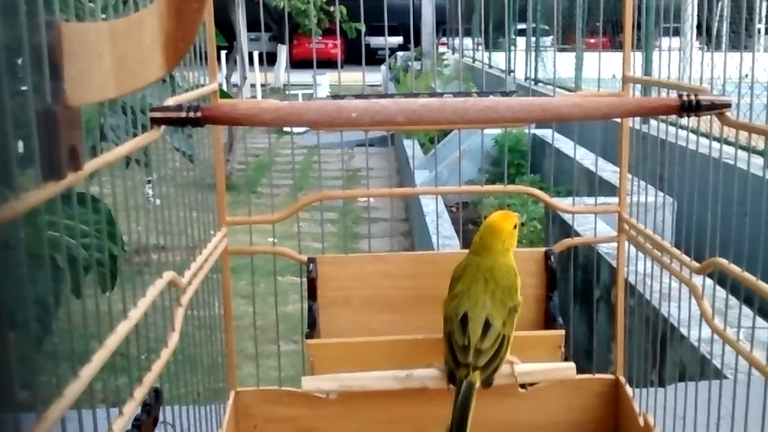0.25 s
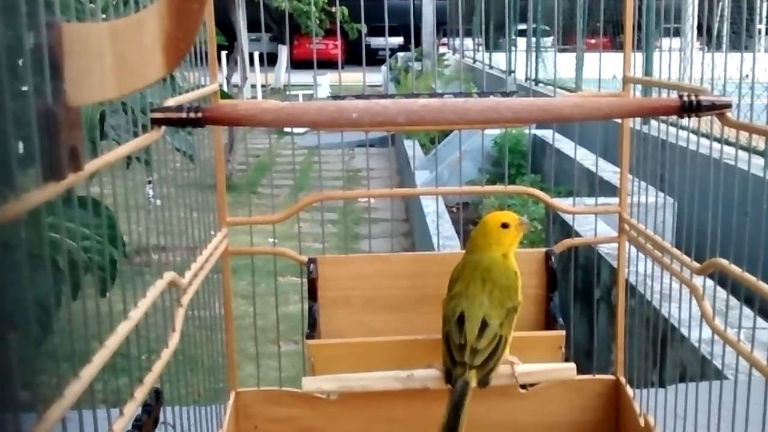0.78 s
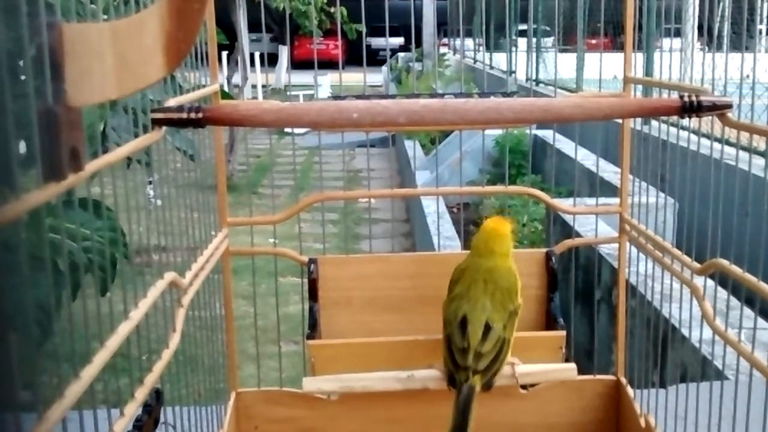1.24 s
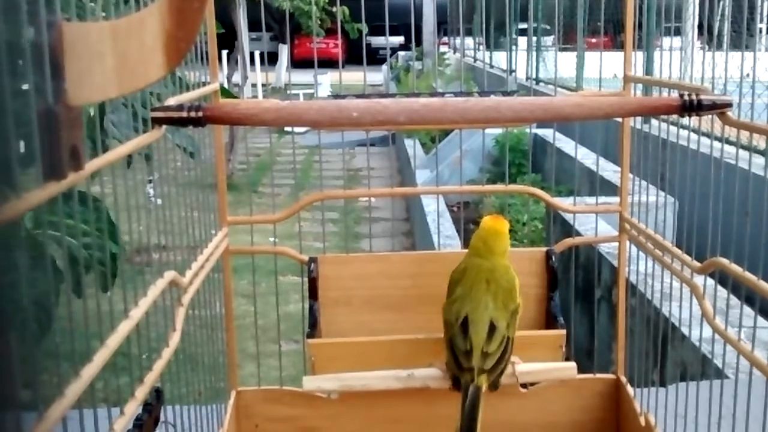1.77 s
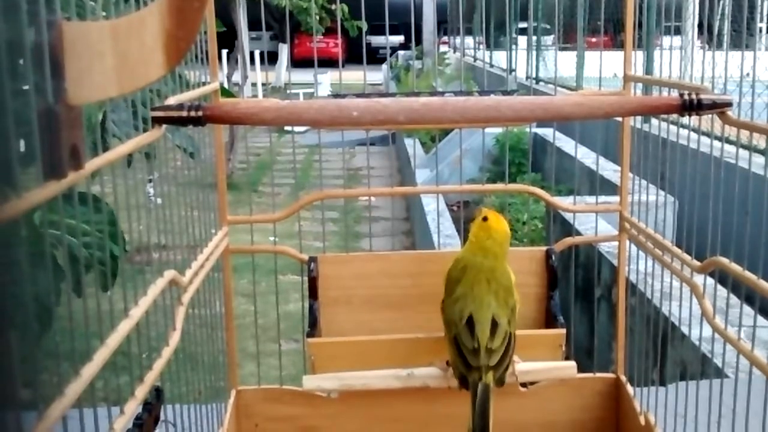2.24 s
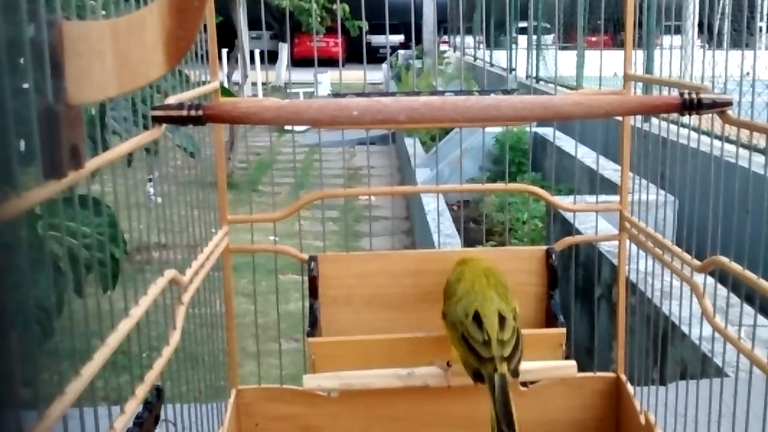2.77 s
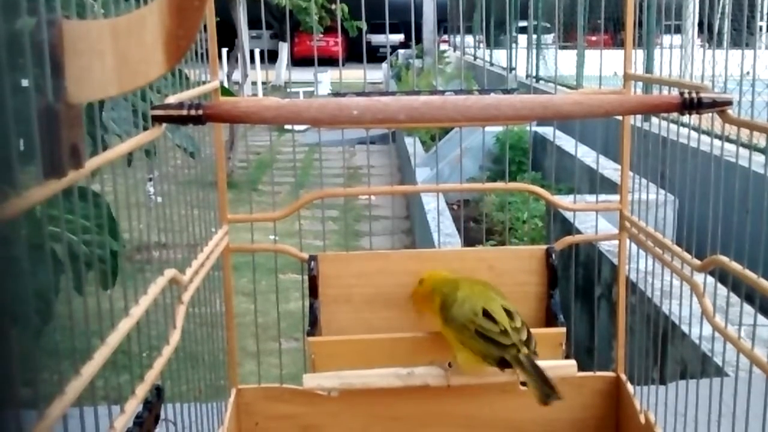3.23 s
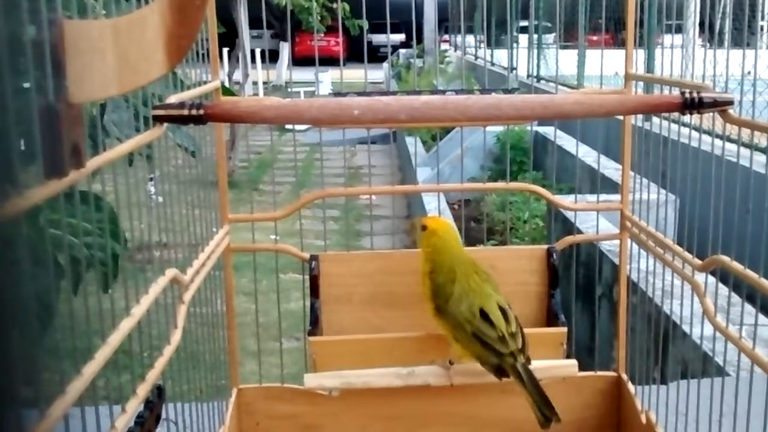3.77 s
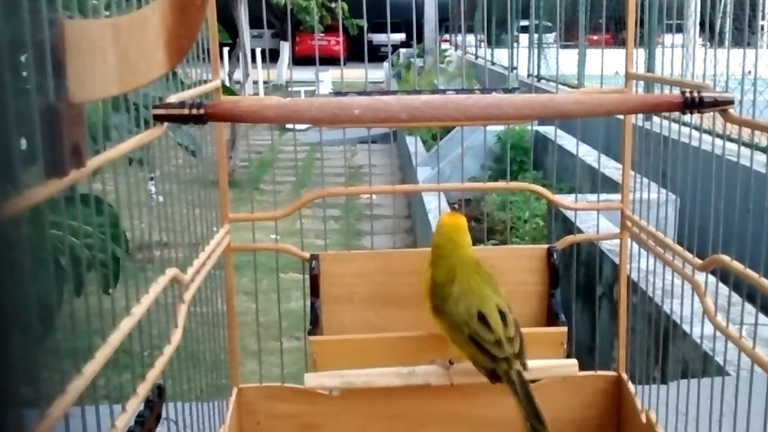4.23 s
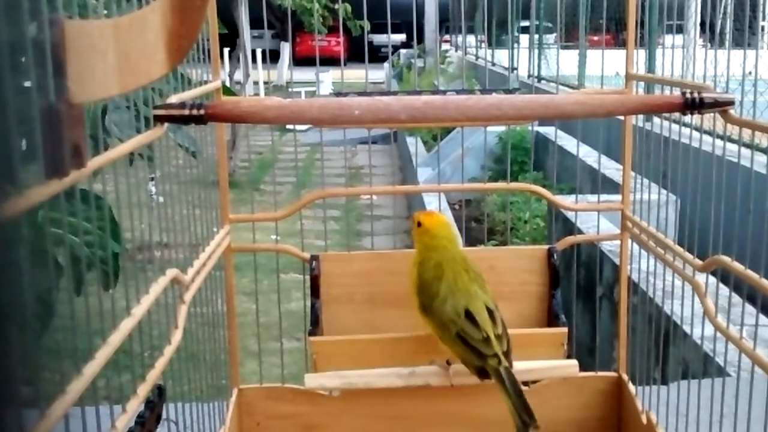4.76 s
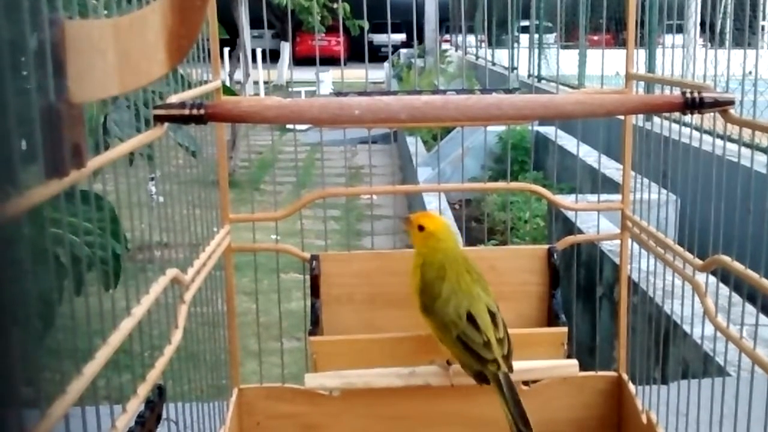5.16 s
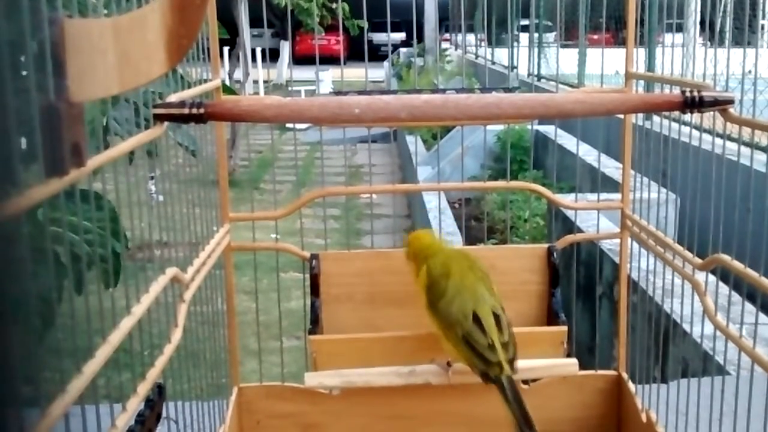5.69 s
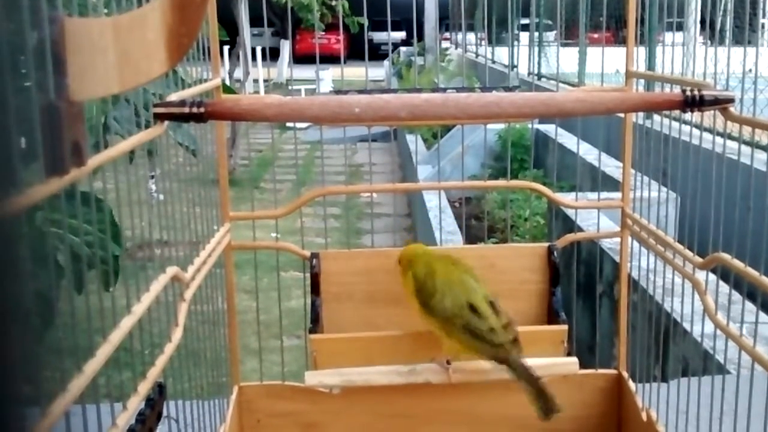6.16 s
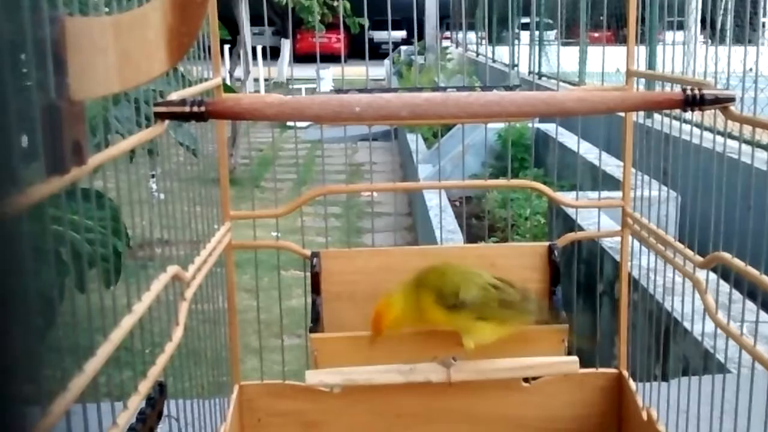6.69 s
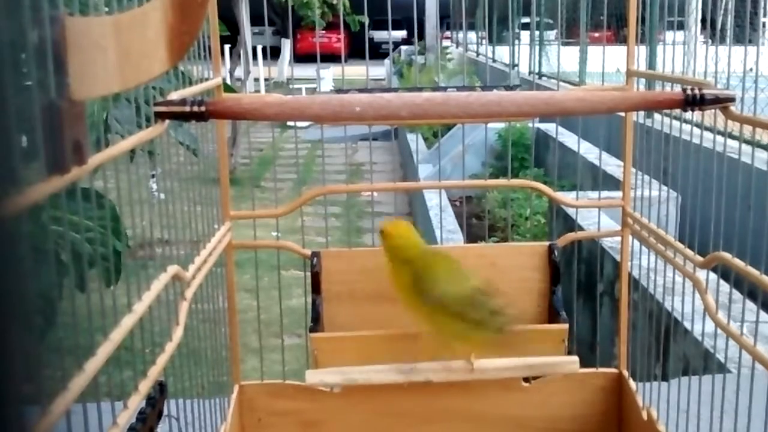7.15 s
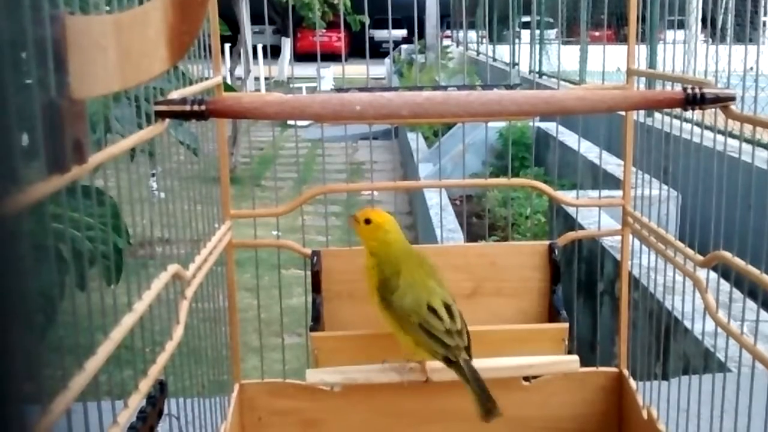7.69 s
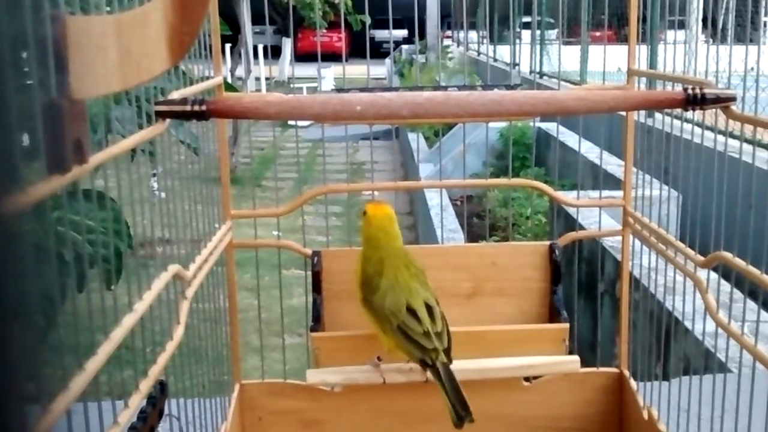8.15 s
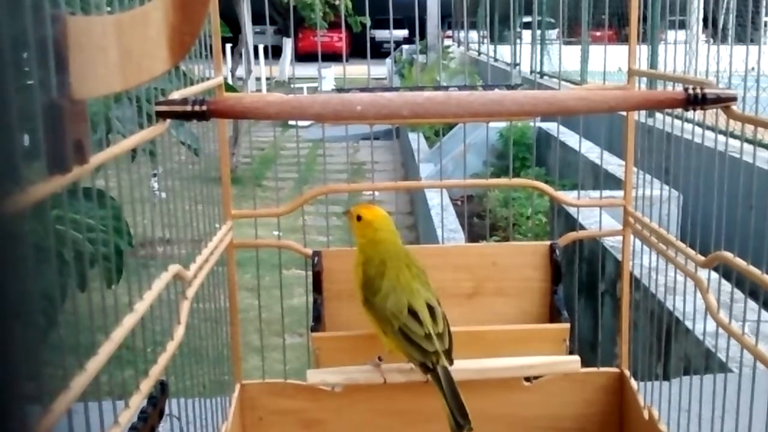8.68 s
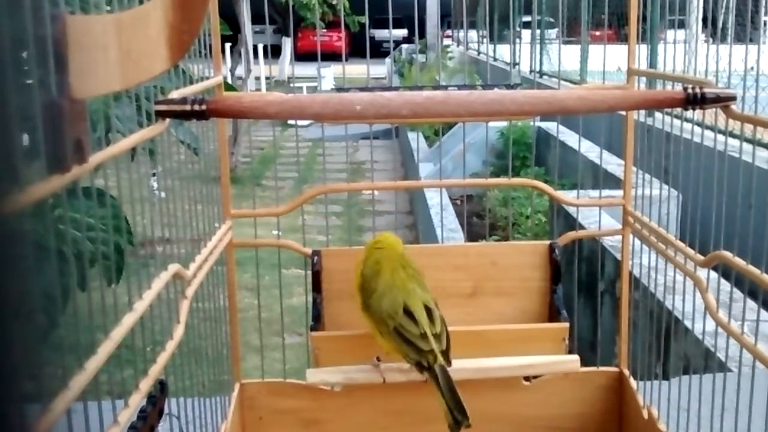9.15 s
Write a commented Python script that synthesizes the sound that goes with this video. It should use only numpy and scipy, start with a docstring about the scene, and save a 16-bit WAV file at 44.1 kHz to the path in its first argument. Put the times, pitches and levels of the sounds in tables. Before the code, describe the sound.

A small finch very close to a pocket stereo microphone sings brief, piercing whistles that swoop downward, singly or in tight pairs, with gaps between. Claws tick lightly on the wooden perch. Far birds trill and whistle softly. A low traffic hum, thin air hiss and gentle wind buffeting lie beneath. The walled yard gives slight, quick echoes.

```python
"""A caged finch whistles sharp falling notes close to a pocket camera with two microphone ports, in a walled yard.
Each note is a gliding near sine with an echo off the cage; three faint wall echoes and a dense ringing yard answer.
Claws tick on the perch as noise bursts; other birds trill and warble far off as softer glides.
Shaped noise makes the far traffic rumble, the air hiss and the wind buffeting the ports.
The camera's gain control ducks everything just after a loud note."""
import sys
import numpy as np
from scipy import signal
from scipy.fft import rfft, irfft
from scipy.io import wavfile
from scipy.ndimage import uniform_filter1d, minimum_filter1d

SR = 44100
rng = np.random.default_rng(int(sys.argv[2]) if len(sys.argv) > 2 else 0)


def generate_wav(sig):
    """Save sig (samples, or channels by samples) to the path in sys.argv[1] as 16-bit PCM at SR."""
    pcm = np.round(np.clip(np.atleast_2d(sig).T, -1, 1) * 32767).astype(np.int16)
    wavfile.write(sys.argv[1], SR, pcm)


N = 415422

# Traffic rumble and hiss at the left port: (frequency [Hz], level [dB per Hz])
RUMBLE = [(20, -70), (49, -64), (58, -51.5), (72, -68), (95, -67.5), (250, -58.5), (420, -67.5), (900, -77),
          (1900, -84), (2500, -91), (3500, -86), (5500, -87.5), (7000, -90.5), (10000, -92.5), (16000, -95)]
# Slow rise and fall of the traffic: (time [s], level [dB])
TRAFFIC_SWELL = [(0, 0), (3, 1.5), (7, 2.5), (7.8, 5), (9.42, 2)]
# Wind gusts on the ports: (middle [s], half width [s], level [dB])
GUSTS = [(0, 0.13, -45.5), (1.25, 0.31, -39.5), (4.42, 0.085, -32), (5.7, .5, -45)]
BREEZE_DB = -52.5  # steady light wind under the gusts
# Far whistles: (time [s], length [s], first pitch [Hz], last pitch [Hz], level [dB])
FAR_WHISTLES = [(0.986, 0.32, 5500, 5615, -62.5), (1.622, 0.17, 3817, 3728, -53),
                (5.649, .45, 5340, 5450, -58.5), (3.797, .02, 3450, 3550, -49),
                (3.844, 0.033, 3720, 3286, -44.5), (3.872, 0.089, 3680, 3650, -52.5),
                (3.895, 0.024, 3296, 3200, -47.5), (6.55, .4, 4030, 4050, -59),
                (8.72, 0.093, 1375, 1420, -47), (8.789, 0.1, 1446, 1580, -47)]
# Far even chatter of falling chips:
# (time [s], gap [s], length [s], first pitch [Hz], last pitch [Hz], level [dB])
CHATTER = (3.985, .079, .028, 3850, 3250, -42)
CHATTER_CHIPS, TRILL_CHIPS = 4, 13
# Far trills of rising chips that speed up: (time [s], first gap [s], shrink of the gap [s], level [dB])
TRILLS = [(2.226, .083, .0014, -39), (7.988, .0785, .00094, -36)]
# Claws on the perch: (time [s], level [dB], lower band against that level [dB])
TICKS = [(3.76, -42, 9), (4.1627, -31, -1), (4.4009, -32, -2.5), (5.7178, -25, -2), (6.016, -31.5, 2),
         (6.8081, -37.5, 9), (7.1313, -30, 4)]
TICK_T60_S = 0.036
# Right port against left: (frequency [Hz], level [dB], lag [rad], likeness of diffuse sound [0-1])
PORTS = [(0, -9.5, 2.0, 0.11), (248, -11, 3.4, 0.86), (830, -2.5, 6, 0.31), (2404, 0, 8.94, 1),
         (3430, -1, 12.36, .92), (4488, -1.65, 15, 0.98), (5580, -7, 18.6, 0.41), (6280, -16.5, 20.2, 0.28),
         (7137, -22.5, 21.4, 0.087), (8896, -16.5, 24.5, 0.17), (15800, -9, 45, .2)]
# Ringing of the yard: (frequency [Hz], time to fall 60 dB [s])
YARD = [(3000, 1), (5000, 0.61), (7000, 0.71), (10000, 0.18), (15000, 0.13)]
# Distinct wall echoes: (delay [s], level [dB])
WALLS = [(.055, -45), (.095, -43), (.205, -45)]
# Echoes off the cage floor and tray: (extra path [m], level [dB])
CAGE = [(1.9, -19), (2.9, -25)]
# The finch's overtones: (multiple of the pitch [-], level [dB])
OVERTONES = [(2, -28.5), (3, -43)]
# The finch's five kinds of note, each with columns (time [s], length [s], top [Hz], bottom [Hz], level [dB],
# swell over the note [dB], extra path of the cage echo [m], level of that echo [dB], bend of the fall [-])
# Falling notes, straight to curved, most of them leading into a held note
FALLS = [(0.024, 0.052, 7850, 6300, -7.5, -16, 0.5, -9, 1.8),
         (0.648, 0.046, 8150, 5424, -0.5, 7, 0.52, -0.5, 1.6),
         (1.961, 0.052, 4508, 3300, 5.5, -10.5, 1.6, -9.5, 1),
         (4.692, 0.043, 7970, 6000, -6, -9.5, 0.44, -1.5, 1.3),
         (5.316, 0.041, 8090, 5850, 1, -8.5, 0.52, -7.5, 1.42),
         (6.254, 0.042, 8630, 6046, 0, -10.5, 0.443, -5.5, 2.1),
         (7.794, 0.042, 7900, 5850, -2.5, 4.5, 1.42, -8.5, 1.4),
         (8.887, 0.045, 7650, 5600, -1.5, 9, 1.13, -14, 1.05)]
# Quick drops onto a held low note
HOLDS = [(0.0745, 0.033, 5800, 4433, 9, -0.5, 0.964, -19.5, 2.7),
         (0.698, 0.035, 5410, 4320, 8, -6, 1.7, -13.5, 2.2),
         (4.742, 0.029, 5483, 4433, 5, -10, 2.17, -8.5, 2.6),
         (5.36, 0.037, 5800, 4498, 5, -4, 0.311, -8, 2.2), (6.304, 0.03, 5370, 4515, 4.6, 1, 0.53, -7, 2.6),
         (7.841, 0.036, 5624, 4367, 4.6, -4, 0.339, -6.5, 2.2),
         (8.934, 0.035, 5360, 4479, 2, 3, 1.019, -9.5, 2)]
# Short soft grace notes before a sweep
GRACES = [(1.36, 0.022, 7500, 6760, -6.5, -20.5, 0.64, -2, 1.8),
          (1.813, 0.024, 7390, 7080, 0.5, -14, 0.638, 0, 1.8),
          (2.435, 0.018, 7600, 6505, -17, 3, 1.5, -5.5, 1.3),
          (2.899, 0.02, 7580, 6810, -10.5, -14, 1.2, -1.5, 1.8)]
# Long sweeps that level off and flick up
SWEEPS = [(1.384, 0.065, 7400, 4462, 6, 3, 0.241, -8.5, 1.5),
          (1.835, 0.061, 7500, 5255, 6.5, 7, 0.31, -4, 1.3),
          (2.458, 0.065, 7280, 4210, 6, 8.5, 0.95, -2, 1.4),
          (2.925, 0.068, 7410, 4170, 4, -4, 0.32, -10.5, 1.6)]
# Single falling slides, sung alone, that end nearly level in pitch
SLIDES = [(4.252, 0.048, 6720, 4737, -1.5, -7.5, 0.55, -9, 1.9),
          (7.259, 0.047, 6590, 4914, -3, 6.5, 0.87, -9, 1.6)]
# How each kind is sung: (notes, share of the length at the top [0-1], share where the bottom is reached [0-1],
# final upturn [Hz], attack [s], release [s])
SONG = [(SLIDES, 0.0082, .9, 60, .005, 0.0068), (FALLS, .13, .97, 30, 0.0034, .009),
        (HOLDS, .05, .27, 180, .006, 0.009), (GRACES, .01, .8, 100, 0.003, 0.0073),
        (SWEEPS, 0.0047, .87, 300, .008, 0.0051)]
# The last note is hoarse: (from time [s], pitch flutter [Hz], level flutter [dB])
HOARSE = (8.93, 80, 1.5)
# The last note splits into two strands: (from time [s], spacing [Hz], depth [0-1])
SPLIT = (8.93, 560, .6)
EDGE_DB = -26  # added to the level at both ends of a note
THIN_HZ, THIN_DB_PER_KHZ = 7660, -22.5  # the finch's voice thins out above this pitch
SOUND_M_PER_S = 343
BAND_LIMIT_HZ = 15750


def gain_of(db):
    """Decibels to gain."""
    return 10 ** (np.asarray(db) / 20)


def read(points, hz):
    """A table read on a log-frequency axis."""
    f, value = np.transpose(points)
    return np.interp(np.log(hz + 1), np.log(f + 1), value)


def ramp(x, start, end):
    """Straight line from zero at start to one at end, held flat outside."""
    return np.clip((x - start) / (end - start), 0, 1)


def add(mix, time_s, sound):
    """Mixes a sound in at a time."""
    part = mix[round(time_s * SR):][:len(sound)]
    part += sound[:len(part)]


def ports(left, other=None, shadow=0.89):
    """The right port hears the left one's sound late and shadowed; diffuse sound is only partly shared."""
    hz = np.fft.rfftfreq(len(left), 1 / SR)
    f, *columns = np.transpose(PORTS)
    db, lag, same = (np.interp(hz, f, column) for column in columns)
    right = rfft(left)
    if other is not None:
        same = np.clip(same, 0, 1)
        right = same * right + np.sqrt(1 - same ** 2) * rfft(other)
    db = np.where(hz > 4000, shadow * db, db)  # diffuse treble reaches round the camera body
    return np.array([left, irfft(right * gain_of(db) * np.exp(-1j * lag), len(left))])


def whistle(length, hz, db, steps, edge, flutter_hz, flutter_db, overtones=(), hiss_db=-99):
    """A near sine along pitch and level points, with unsteady pitch and level and a faint hiss along the tone."""
    at = np.linspace(0, 1, round(length * SR))
    pitch, level = (uniform_filter1d(np.interp(at, steps, c), 40, mode="nearest") for c in (hz, db))
    hiss, *shake = rng.standard_normal((3, SR // 2))
    # smoothed noise, scaled back to an rms near 1
    waver, flicker = (8 * uniform_filter1d(uniform_filter1d(c, 50), 50)[:len(at)] for c in shake)
    phase = 2 * np.pi * np.cumsum(pitch + flutter_hz * waver) / SR
    tone = np.sin(phase)
    for multiple, overtone_db in overtones:
        tone = tone + gain_of(overtone_db + 3.5 * flicker) * np.sin(multiple * phase)
    tone += gain_of(hiss_db) * np.diff(hiss)[:len(at)]
    fade = signal.windows.tukey(len(at), min(edge / length, 1))
    return gain_of(level + flutter_db * flicker) * tone * fade


def background(patchy_db=1.5):
    """Traffic rumble and air hiss: random short-time spectra in drifting patches."""
    frames, hz = N // 1024 + 5, np.fft.rfftfreq(4096, 1 / SR)  # long frames resolve the low hum
    a, b, c, d, patches = rng.standard_normal((frames, len(hz), 5)).T
    patches = uniform_filter1d(uniform_filter1d(patches, 40, 0), 4, 1)
    swell_db = np.interp(np.arange(frames) * 1024 / SR, *np.transpose(TRAFFIC_SWELL))
    low = np.clip(1.5 - hz / 4000, 0, 1)[:, None]  # traffic swells, the hiss stays
    size = gain_of(read(RUMBLE, hz)[:, None] + low * swell_db + patchy_db * patches / patches.std())
    spectra = np.array([a + 1j * b, c + 1j * d]) * size * 2.893  # scale for dB per Hz
    noise = signal.istft(spectra, nperseg=4096, noverlap=3072)[1]
    return ports(*noise[:, :N], shadow=0.051)


def wind():
    """Lumpy low buffeting that pushes the two ports in opposite ways."""
    low_band = signal.butter(2, [15, 60], "band", fs=SR, output="sos")
    shared, own = signal.sosfilt(low_band, rng.standard_normal((2, N)))
    t = np.arange(N) / SR
    gust = gain_of(BREEZE_DB)
    for middle, half_width, db in GUSTS:
        gust = gust + gain_of(db) * np.exp(-((t - middle) / half_width) ** 2)
    return gust / shared.std() * np.array([shared, 0.72 * own - 1.4 * shared])


def far_birds():
    """Far whistles and chatter, blurred by the air, and trills whose chips swell and grow steeper."""
    out = np.zeros(N)
    start, gap, *chip = CHATTER
    chatter = [(start + k * gap, *chip) for k in range(CHATTER_CHIPS)]
    for time_s, length, hz0, hz1, db in FAR_WHISTLES + chatter:
        blur_hz = .006 * hz0 + .2 * abs(hz1 - hz0)
        add(out, time_s, whistle(length, (hz0, hz1), (db, db), (0, 1), .02, blur_hz, 3.0))
    for start, gap, shrink, db in TRILLS:
        for k in range(TRILL_CHIPS):
            swell_db = db - 2.6 * abs(2 * k / TRILL_CHIPS - 1)  # strongest in mid trill
            length, hz = .027 - .0012 * k, (6750, 8300 + 60 * k)
            chip = whistle(length, hz, (swell_db, swell_db - 6.5), (0, 1), 0.008, 200, 4.1)
            add(out, start + gap * k - shrink * k * k / 2, chip)
    return out


def ticks():
    """Claws on wood and wire: short bursts of noise, bright with a lower knock."""
    out, t = np.zeros(N), np.arange(1200) / SR
    high = signal.butter(2, 4000, "high", fs=SR)
    low = signal.butter(2, [1500, 6000], "band", fs=SR)
    for (time_s, db, low_db), noise in zip(TICKS, rng.standard_normal((len(TICKS), 1200))):
        burst = noise * gain_of(db - 60 * t / TICK_T60_S)
        knock = gain_of(low_db) * signal.lfilter(*low, burst)
        add(out, time_s, signal.lfilter(*high, burst) + knock)
    return out


def yard(x, gap=0.017, lumpy_db=3.0):
    """Dense reflections from walls and paving that build up late in clumps, each band dying at its own speed."""
    hz, t, z = signal.stft(rng.standard_normal((2, SR)), SR, nperseg=256)
    lumps = uniform_filter1d(rng.standard_normal(z.shape[1:]), size=30, axis=0)
    lumps = uniform_filter1d(lumps, size=3, axis=1)
    decay_db = -60 * t / read(YARD, hz)[:, None]
    tail = signal.istft(z * gain_of(lumpy_db * lumps / lumps.std() + decay_db), SR, nperseg=256)[1]
    tail = tail * np.clip(np.arange(tail.shape[1]) / SR / gap - .3, 0, 1)  # late build-up
    wet = signal.fftconvolve(x[None], tail / np.linalg.norm(tail[0]), axes=1)[:, :N]
    return ports(*wet, shadow=.5)


def finch():
    """The bare notes, and the close echo of each that shifts as the head turns and notches the glide."""
    bare, echo = np.zeros((2, N))
    at = np.linspace(0, 1, 101)  # place within a note
    for notes, top_share, low_share, upturn_hz, attack, release in SONG:
        for time_s, length, top_hz, low_hz, db, swell_db, path, echo_db, bend in notes:
            hz = low_hz + (top_hz - low_hz) * (1 - ramp(at, top_share, low_share)) ** bend
            hz = hz + upturn_hz * ramp(at, min(low_share, .98), 0.92) ** 2
            ends = (1 - ramp(at * length, 0, attack)) ** 2 + ramp(at * length, length - release, length) ** 2
            thin_db = THIN_DB_PER_KHZ * np.maximum(hz - THIN_HZ, 0) / 1000
            level_db = db + swell_db * (at - .5) + EDGE_DB * ends + thin_db
            flutter = HOARSE[1:] if time_s > HOARSE[0] else (25, .4)  # Hz, dB
            note = whistle(length, hz, level_db, at, 0.0017, *flutter, OVERTONES, -48)
            if time_s > SPLIT[0]:
                _, spacing_hz, depth = SPLIT
                strands = 2 * np.cos(np.pi * spacing_hz * np.arange(len(note)) / SR)
                note = note * (1 - depth + depth * strands)
            add(bare, time_s, note)
            add(echo, time_s + path / SOUND_M_PER_S, gain_of(echo_db) * note)
    for path, db in CAGE:
        add(echo, path / SOUND_M_PER_S, gain_of(db) * bare)
    return bare, echo


def scene():
    """Near bird with a little yard and three faint wall echoes, far birds with much yard."""
    (bare, echo), far, claws = finch(), far_birds(), ticks()
    bright = signal.lfilter(*signal.butter(2, 5200, "high", fs=SR), bare)  # high notes beam toward the walls
    near = bare + echo
    for delay, db in WALLS:
        add(near, delay, gain_of(db) * bright)
    wet = yard(gain_of(-27) * bright + gain_of(-7) * far + gain_of(-12) * claws)
    return ports(near) + ports(far + claws, shadow=0.61) + wet + background() + wind()


def record(dry, knee_db=-26, share=.5, back_db=20, lag_s=.04, ceiling=.95):
    """Gain falls just after a loud note and creeps back; a quick limiter holds the peaks; then the band limit."""
    power_db = 10 * np.log10(abs(uniform_filter1d(dry[0] ** 2, 1500)) + 1e-12)
    power_db[0] = -18.5  # the gain starts slightly lowered
    fall = np.arange(N) * back_db / SR  # the held level sinks back_db each second
    over_db = np.maximum(np.maximum.accumulate(power_db + fall) - fall - knee_db, 0)
    late = np.r_[np.full(round(lag_s * SR), over_db[0]), over_db][:N]
    ducked = dry * gain_of(-share * uniform_filter1d(late, 1500, mode="nearest"))
    room = minimum_filter1d(np.minimum(ceiling / (abs(ducked).max(0) + 1e-9), 1), size=61)
    held = ducked * uniform_filter1d(room, size=61)
    band_limit = signal.firwin(255, BAND_LIMIT_HZ, window=("kaiser", 9), fs=SR)
    return signal.oaconvolve(held, band_limit[None], "same")


dry = scene()
out = record(dry)
generate_wav(out)
```